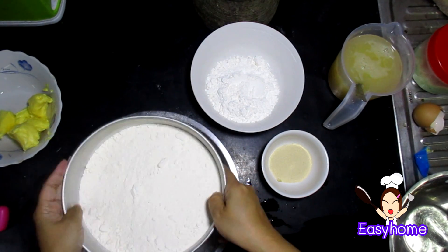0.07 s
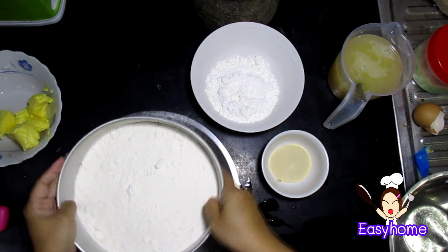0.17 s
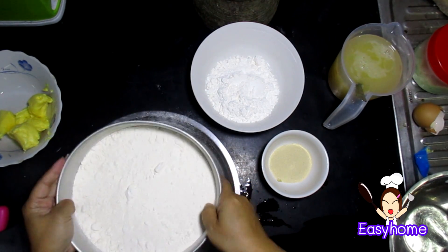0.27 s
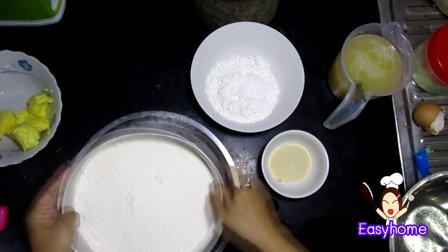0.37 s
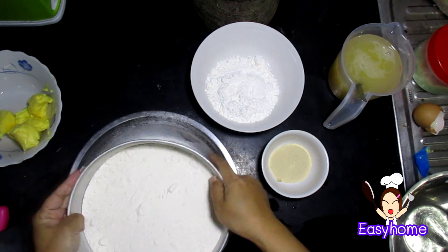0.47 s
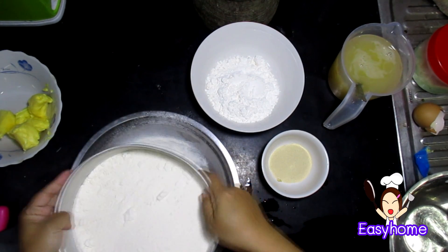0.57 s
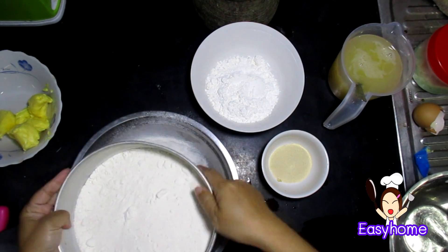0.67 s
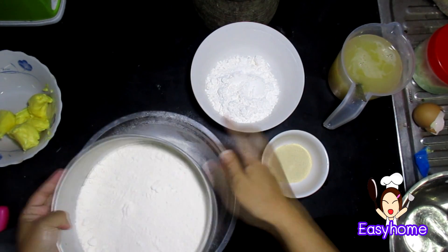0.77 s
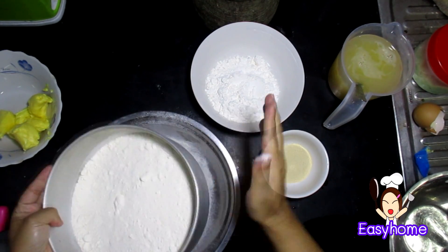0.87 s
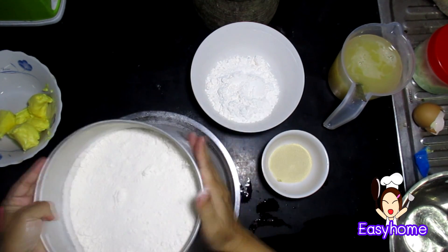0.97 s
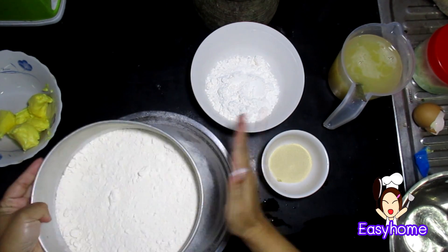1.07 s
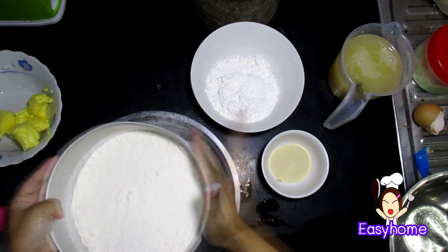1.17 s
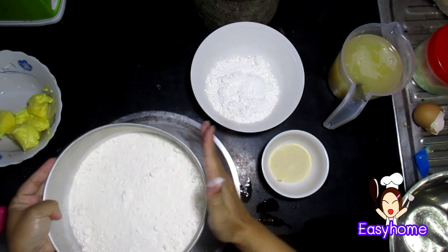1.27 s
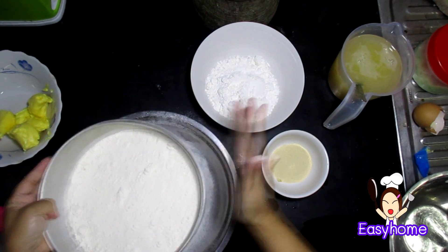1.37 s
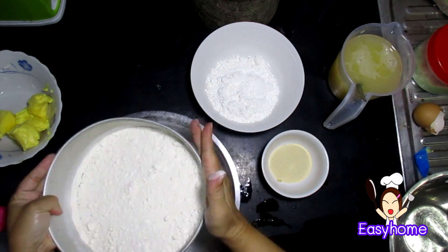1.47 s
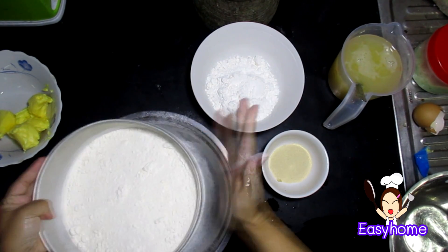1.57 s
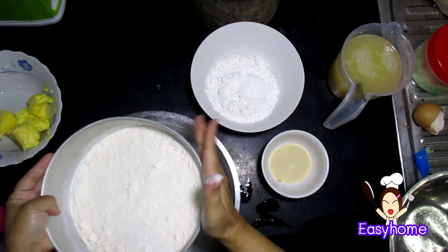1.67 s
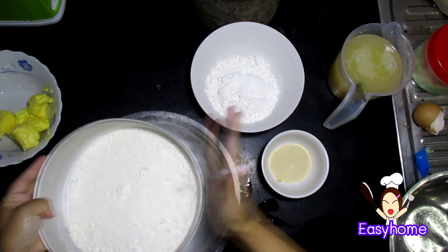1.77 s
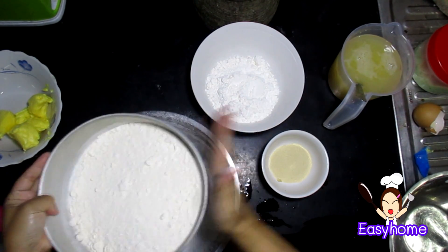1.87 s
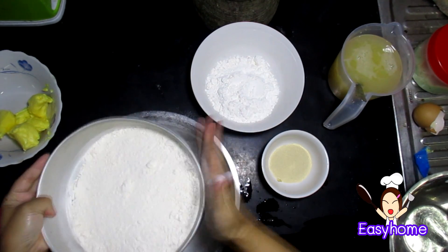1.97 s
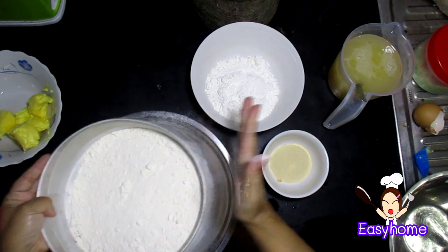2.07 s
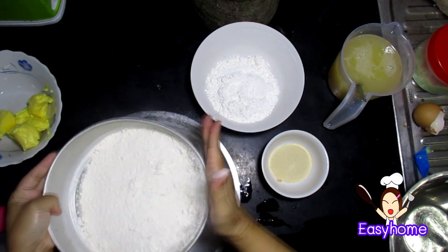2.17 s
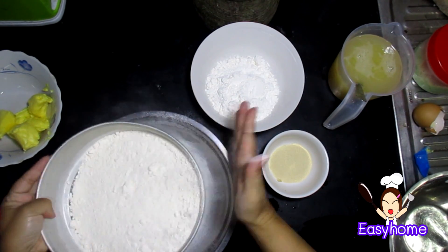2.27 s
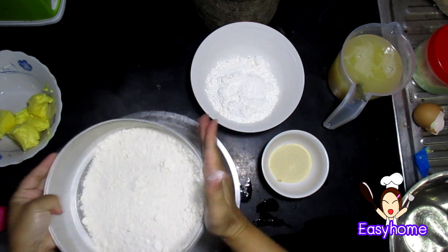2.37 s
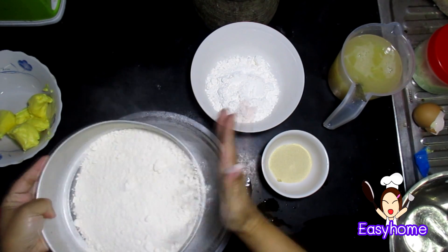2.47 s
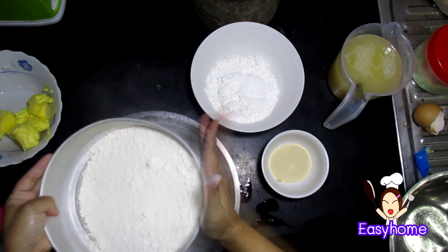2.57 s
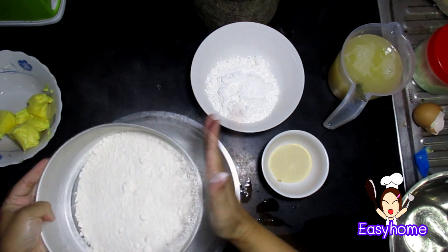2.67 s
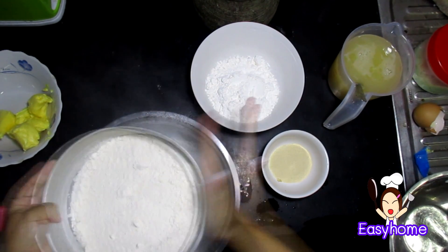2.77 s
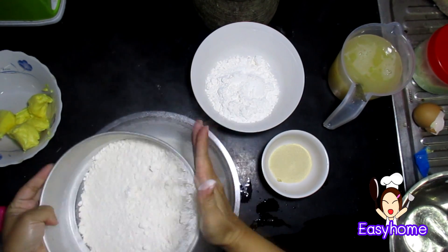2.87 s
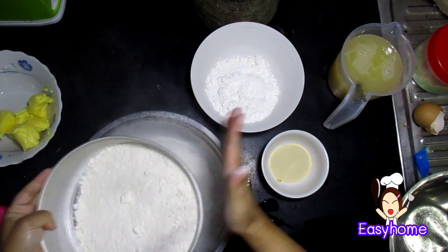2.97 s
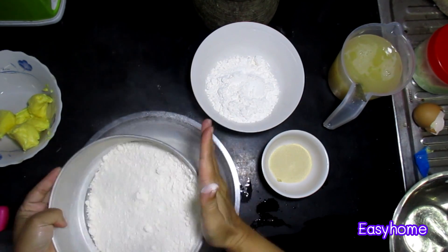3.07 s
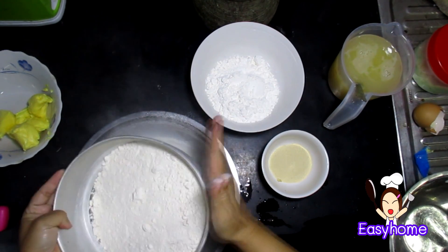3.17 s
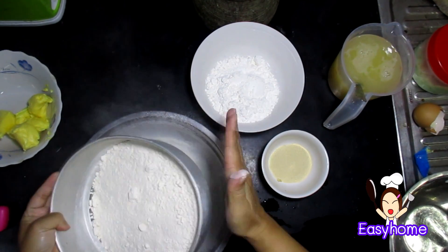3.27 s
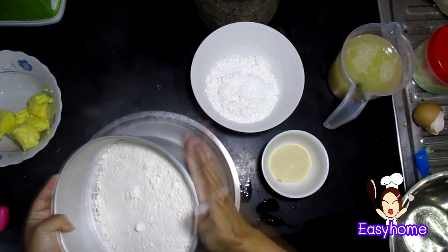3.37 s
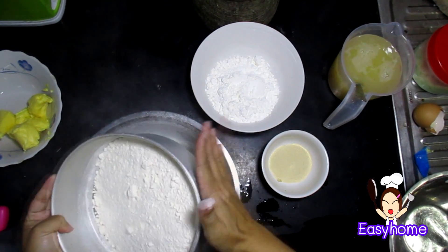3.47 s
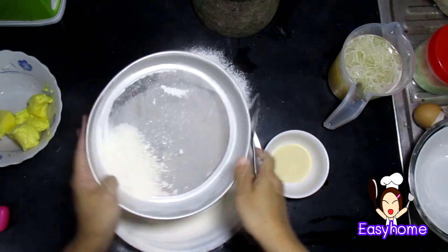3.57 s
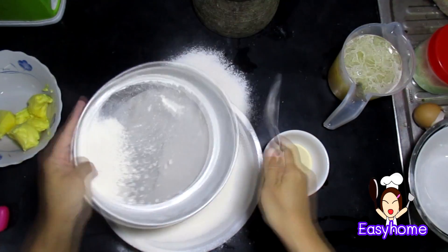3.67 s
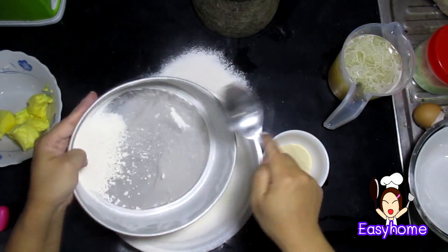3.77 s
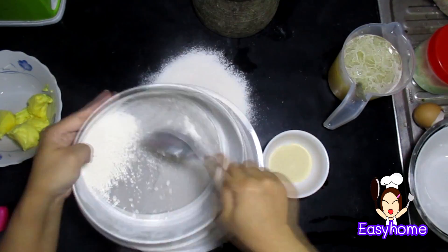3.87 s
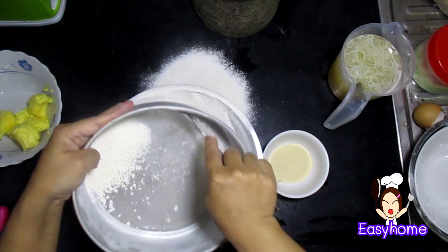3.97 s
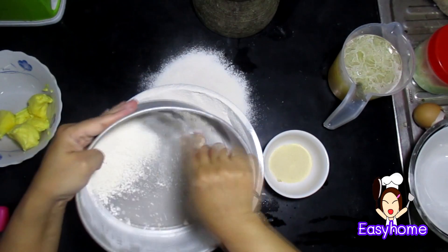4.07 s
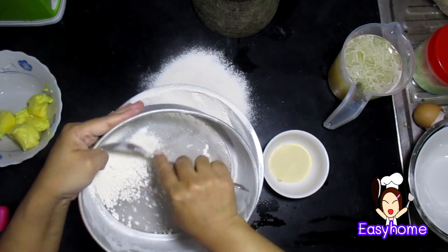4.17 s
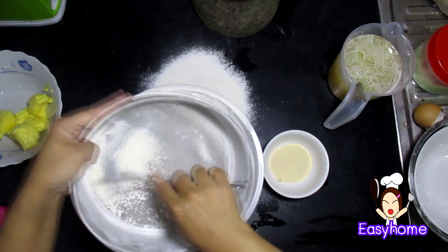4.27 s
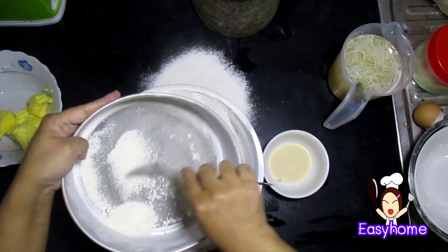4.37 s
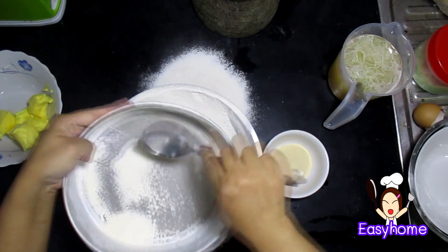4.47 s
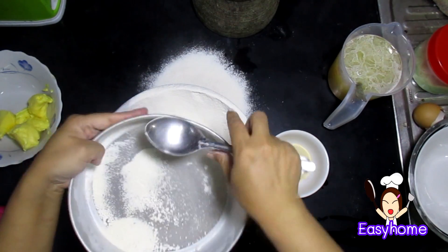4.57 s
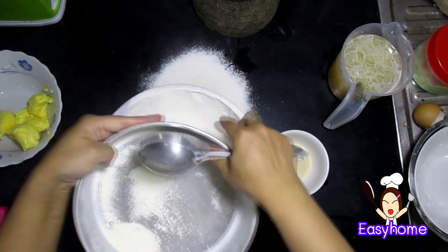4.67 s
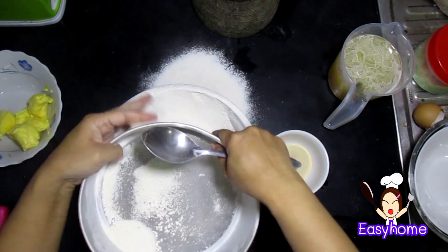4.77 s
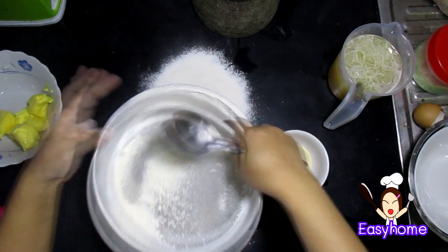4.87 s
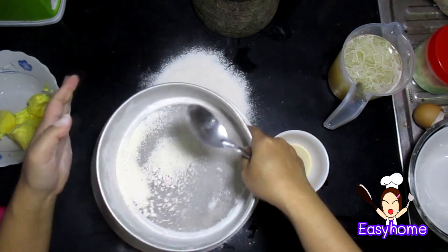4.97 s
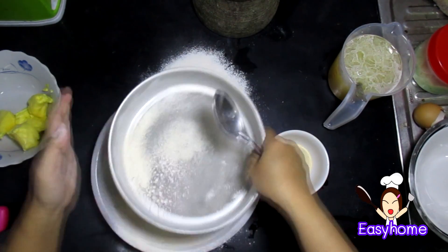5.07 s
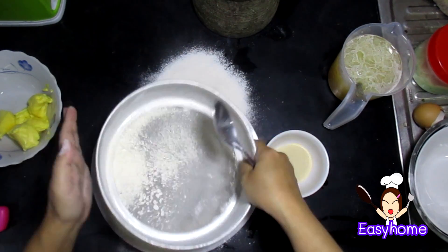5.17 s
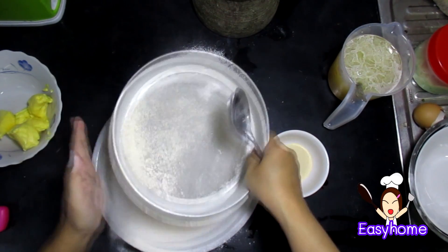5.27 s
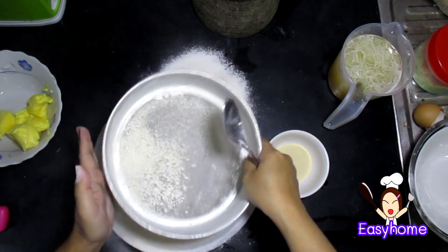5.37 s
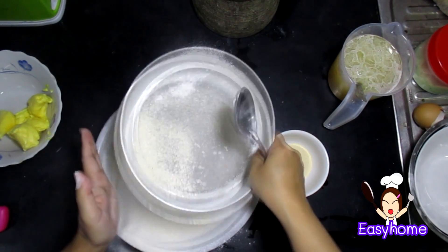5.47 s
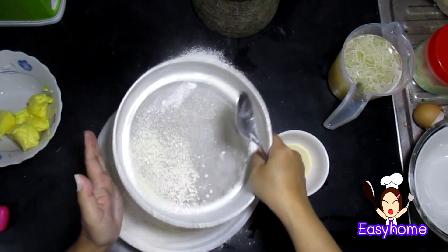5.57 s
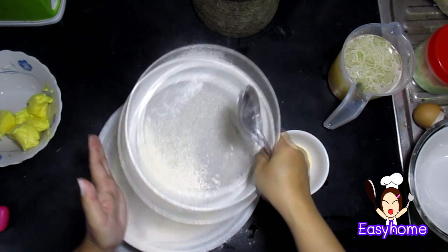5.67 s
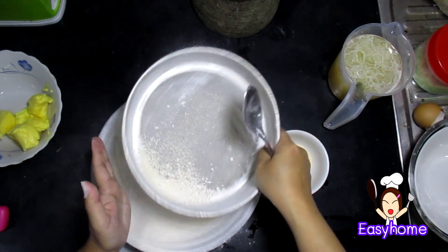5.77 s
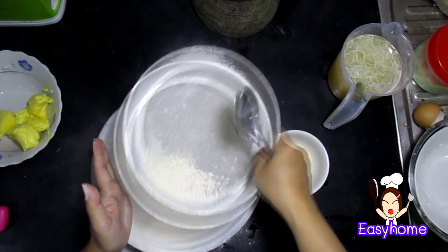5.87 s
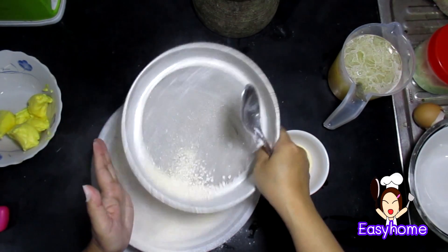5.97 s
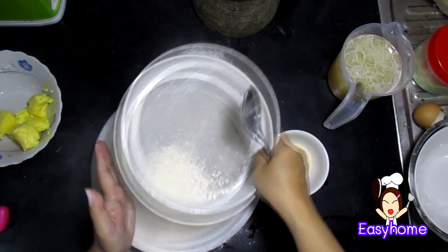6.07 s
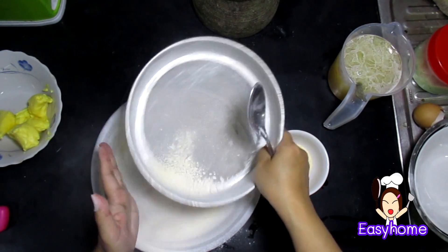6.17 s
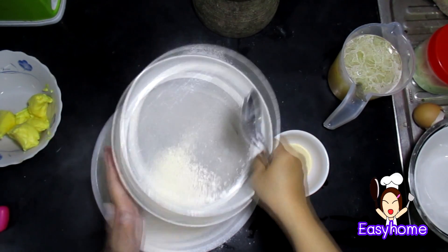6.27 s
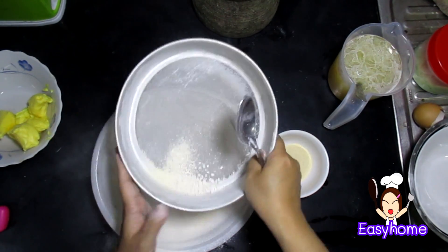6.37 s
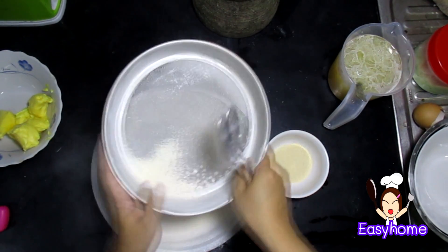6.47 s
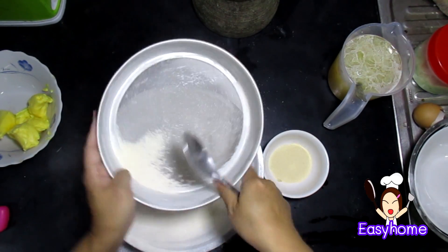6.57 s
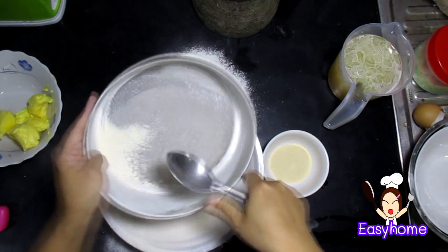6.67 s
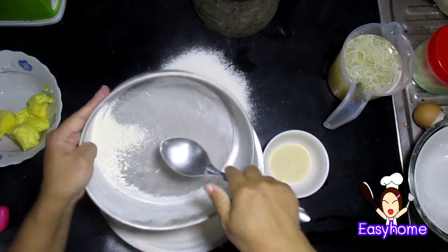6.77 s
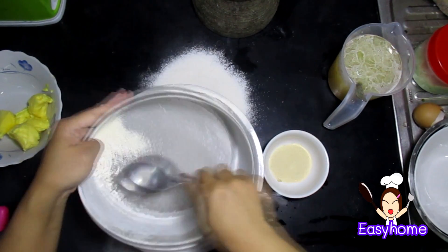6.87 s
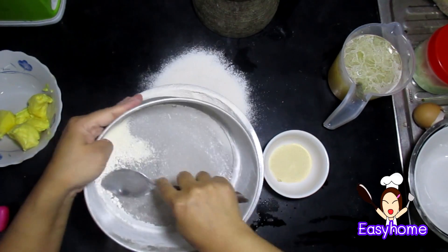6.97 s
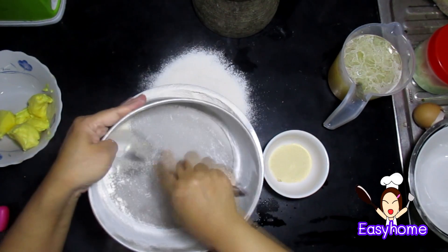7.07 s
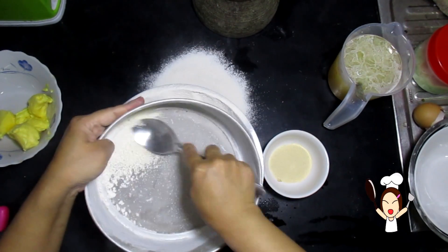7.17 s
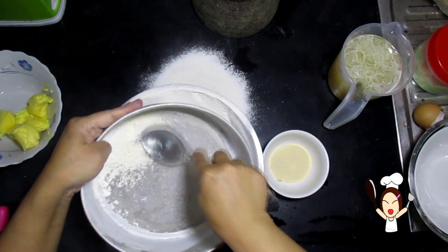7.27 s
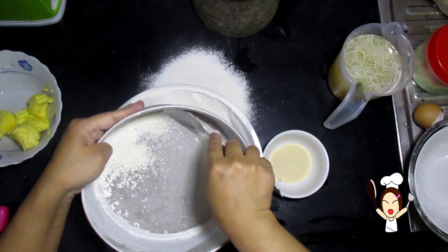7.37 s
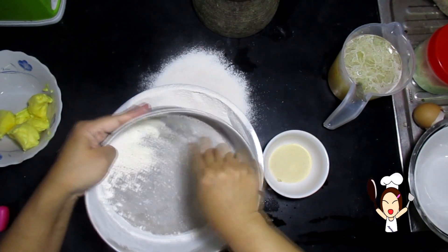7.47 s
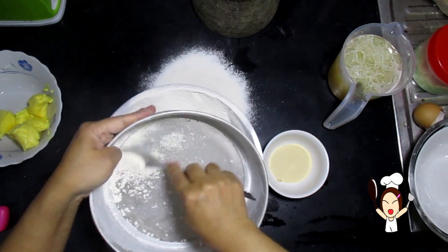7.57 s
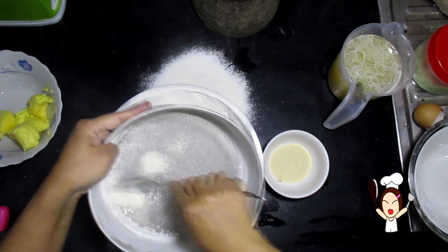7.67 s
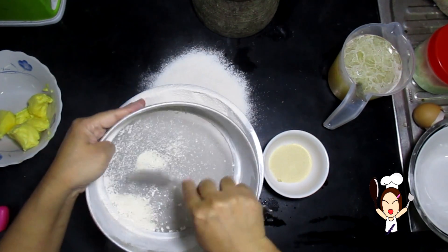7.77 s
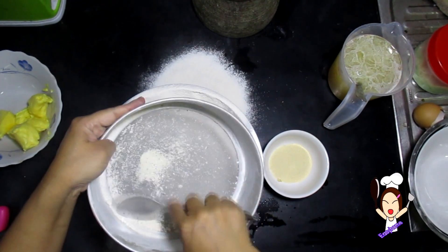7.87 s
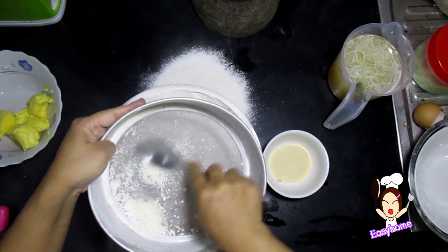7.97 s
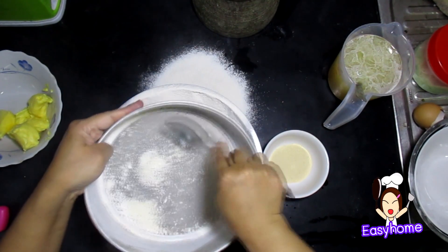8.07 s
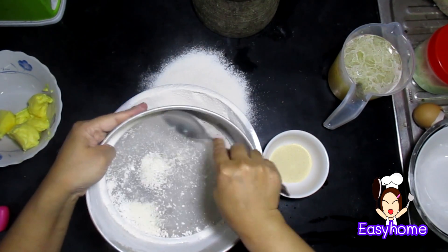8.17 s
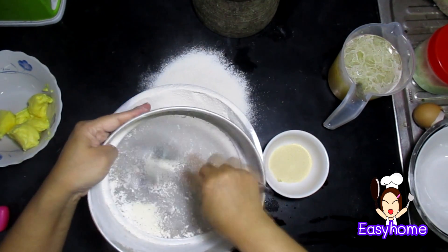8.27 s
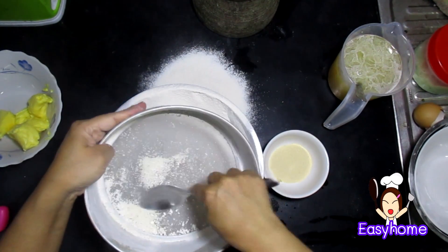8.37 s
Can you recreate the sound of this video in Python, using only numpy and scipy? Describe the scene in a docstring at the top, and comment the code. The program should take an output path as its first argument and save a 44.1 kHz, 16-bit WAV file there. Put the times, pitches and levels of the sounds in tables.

```python
"""A round metal sieve full of flour, in a kitchen, on one microphone. A palm slaps the rim and the laden
mesh thumps; then a metal spoon scrapes and knocks it, with a gentle shake between two bouts. Blows and
scrapes set the metal ringing, and flour hisses across the wires. Behind it the kitchen hums at mains
pitch, a far engine is heard idling at first and a narrow hiss, perhaps insects, sits near 7.5 kHz."""
import sys
import numpy as np
from scipy import signal
from scipy.fft import rfft, irfft
from scipy.io import wavfile

SR = 44100
rng = np.random.default_rng(int(sys.argv[2]) if len(sys.argv) > 2 else 0)


def wav_out(sig):
    """Save sig, one row per channel (or a flat mono array), as 16-bit PCM at SR to the path in sys.argv[1]."""
    wavfile.write(sys.argv[1], SR, np.round(np.clip(np.atleast_2d(sig).T, -1, 1) * 32767).astype(np.int16))


N = 371322

# palm on the rim: t/s, thump level/dB, mid-swing f/Hz, contact/s, crack level/dB,
# lows/dB and mids/dB re crack, favoured ring f/Hz, its force/dB re crack
SLAPS = [(0.9975, -7.5, 238, 0.0044, -1, -16, -7, 1420, -12.5),
         (1.231, -14.5, 168, 0.0076, -9.5, 4, 2, 2704, -8),
         (1.482, -5.5, 218, 0.0041, 0.3, -6.5, -18, 1100, -15),
         (1.713, -12.5, 213, 0.004, 0.6, -7.5, -2.5, 2734, -8),
         (1.943, -10, 222, 0.0027, -1.7, -2.5, -3, 2890, -21.5),
         (2.166, -8, 220, 0.004, -0.4, -10.5, -4.5, 1440, -13.5),
         (2.393, -7, 209, .004, -1.5, -10, -3.5, 1410, -14),
         (2.6226, -10, 211, 0.0043, -4.5, -4.5, -5, 2100, -22),
         (2.8557, -9, 244, .004, -3.5, -3, -2.5, 1100, -17),
         (3.089, -15.5, 287, 0.0037, -12, 2, -4, 1070, -20),
         (3.4376, -19.5, 159, 0.0047, -14.5, -3, -8, 570, -23),
         (3.6194, -41, 162, 0.013, -21.5, -1.5, -9, 2270, -16)]
# modes of sieve and spoon: f/Hz, level/dB, t60/s before damping
METAL_MODES = [(541, -2, 0.089), (1107, -8.5, 0.061), (1417, -9, 0.071), (1610, -6.5, 0.3),
               (2090, -16, 0.23), (2080, -9.5, 0.074), (2317, -1, 0.094), (2510, 0, 0.12),
               (2574, -8.5, 0.2), (2740, -14.5, 0.11), (2850, -19.5, 0.32), (2870, -14, 0.36),
               (2975, -5, 0.21), (3080, 0, 0.065), (3340, -12.5, 0.22), (3780, -14.5, 0.26),
               (5040, -18, 0.055), (5330, 3, 0.078), (6860, 6.5, 0.099), (7240, 6, 0.042),
               (7260, -1.5, 0.19), (7950, 5, 0.078), (8440, 9.5, 0.12), (9330, 6, 0.13), (11190, 0.5, 0.16),
               (12700, -18, .06), (12900, -14, .05)]


def palm_slaps():
    """The palm cracks against the rim: the sound, and the force on the modes."""
    return blows([(s, *crack) for s, _, _, *crack in SLAPS], tail_db=-15.5, unfavoured_db=-41)


def mesh_thumps():
    """The laden mesh swings like a smothered drum skin, tightening as it goes; a dull rumble lingers."""
    out, t = np.zeros(N + SR), np.arange(SR // 5) / SR
    rumble = rms_one(band(rng.standard_normal(N), 92, 430))
    swing_gain = np.exp(-((t - .006) / 0.0041) ** 2) * (1 - np.exp(-t / 0.00052))
    rumble_gain = from_db(-15.5 - 60 * t / 0.17) * (1 - np.exp(-t / 0.0051))
    for s, thump_db, hz, *_ in SLAPS:
        i = round(s * SR)
        phase = 2 * np.pi * hz * t * (0.886 + 8.5 * t)
        swing = swing_gain * (from_db(-15.5) * np.sin(1.92 * phase) - np.sin(phase))
        out[i:i + len(t)] += from_db(thump_db) * (swing + rumble_gain * rumble[i:i + len(t)])
    return signal.sosfilt(signal.butter(2, 70, "high", fs=SR, output="sos"), out[:N])


def spoon_knocks():
    """The spoon strikes mesh or rim: the sound, and the force on the modes."""
    # t/s, contact/s, crack level/dB; re crack: lows/dB, mids/dB, two favoured rings (f/Hz, force/dB)
    knocks = [(4.0452, 0.0035, -3.5, -4.5, -8, 1100, -6, 2710, -8.5),
              (4.0574, 0.0047, -2.5, -3.5, 1.5, 1086, -3.5, 3040, -25),
              (4.180, .0072, -9, -19.5, -21, 8000, -15, 2030, -10),
              (4.2227, .0038, -10.5, 3, 9, 2070, 6, 564, -20),
              (4.6195, 0.0026, -5.5, 3.5, 5.5, 1090, -2, 3680, -8),
              (4.6255, .0055, -5, -21, -23, 7560, -10, 11400, -20),
              (4.7156, 0.0025, 0, -13, -8, 2000, -7.5, 3470, -14),
              (7.0522, 0.0037, -22, 11, 7.5, 557, -7, 5325, -12),
              (7.0884, 0.0063, -26, 15.5, 13, 560, 6.5, 1100, 7),
              (7.13, .004, -26, -6, 3, 2280, -10, 2800, -11),
              (7.177, .004, -25.5, -6, 7, 2280, -9, 1600, -21),
              (7.226, 0.0046, -21, -4, -3, 2290, -18, 3000, -26),
              (7.422, .0034, 0.7, -4, -7, 1070, -7, 2800, -19),
              (7.4548, .0046, -13.5, -7.5, 6, 2210, -12, 1090, -3),
              (7.913, .0044, -16.5, 9.5, 11, 547, -2.5, 2235, -0.5),
              (7.9686, 0.0051, -18, -9, -4, 3330, -5, 5100, -23),
              (8.0015, .0035, -3, -33, -13, 3000, -20, 12110, 1),
              (8.0294, 0.0055, -11, -33, 0, 3100, -14, 7900, -28)]
    return blows(knocks, tail_db=-11, unfavoured_db=-27)


def blows(rows, tail_db, unfavoured_db):
    """Each blow rattles during contact, dies away band by band and kicks the metal's modes."""
    crack_spectrum = [(300, -5), (550, 8.5), (3500, 1), (4500, -1), (5200, 3), (8000, 0.5), (11000, -2),
                      (14000, -7.5), (16000, -15)]   # contact noise: f/Hz, level/dB
    tail_decay = [(400, 0.27), (1500, 0.23), (4000, .2), (8000, 0.19), (15000, 0.18)]   # sound lingering after a blow: f/Hz, t60/s
    edges = 35 * 2 ** (np.arange(9, 28) / 3)   # third octaves from 280 Hz
    centres = np.sqrt(edges[1:] * edges[:-1])
    size, mode_hz = SR // 3, np.array(METAL_MODES)[:, 0]
    t = np.arange(size) / SR
    out, forces = np.zeros(N + SR), np.zeros((len(mode_hz), N + SR))
    noise = coloured(grains(9000, spread_db=1.5), crack_spectrum)
    bands = np.array([band(noise, low, high) for low, high in zip(edges[:-1], edges[1:])])
    tail = from_db(tail_db - 60 * t / at_hz(tail_decay, centres)[:, None])
    for s, contact_s, crack_db, low_db, mid_db, *favoured in rows:
        i, start = round(s * SR), rng.integers(0, N - size)
        rattle = bands[:, start:start + size]
        burst = t / contact_s * np.exp(1 - 2 * t / contact_s)
        tilt = from_db(at_hz([(800, low_db), (2200, mid_db), (4500, 0)], centres))[:, None]
        # the burst carries its full energy in every band
        full_energy = (rattle ** 2).mean(axis=1) * (burst ** 2).sum()
        trim = np.sqrt(full_energy / ((rattle * burst) ** 2).sum(axis=1))
        envelope = trim[:, None] * burst + tail * (1 - np.exp(-t / contact_s))
        out[i:i + size] += from_db(crack_db) * (tilt * envelope * rattle).sum(axis=0)
        force = from_db(unfavoured_db + rng.normal(0, 3, len(mode_hz)))
        for hz, db in np.reshape(favoured, (-1, 2)):   # the spot struck favours some modes
            force += from_db(db) * np.exp(-(np.log(mode_hz / hz) / .06) ** 2)
        signs = rng.choice([-1, 1], len(mode_hz))
        forces[:, i + round(contact_s * SR / 2)] += from_db(crack_db) * force * signs
    return out[:N], forces[:, :N]


def spoon_scrapes():
    """The spoon's edge jumps from wire to wire: a grainy rasp, and force mostly on the lower modes."""
    # bite t/s, level/dB, ease t/s, level/dB, swell/(dB/s), fade/(dB/s);
    # re rasp: treble/dB, mids/dB, lows/dB
    strokes = [(4.075, -30.5, 4.24, -36, 1500, 120, -27, -10.5, -10),
               (4.19, -20.5, 4.248, -23.5, 1230, 700, -25, -7, -18),
               (4.312, -14, 4.3745, -20, 453, 290, -21, -7, -35),
               (7.1, -34, 7.27, -38, 500, 260, -15, -10.5, -6.5),
               (7.586, -20.5, 7.695, -19.5, 139, 257, -25, -8, -36),
               (7.93, -42, 7.99, -36, 800, 300, -10, -7, -14),
               (8.007, -20, 7.99, -23, 1530, 153, -9, -7.5, -36),
               (8.223, -33.5, 8.28, -23, 2200, 120, -25, -5, -22)]
    rasp_spectrum = [(2500, -58), (3500, -39), (4300, 8.5), (5100, 14), (6000, 10), (8000, 12.5),
                     (10400, 2.5), (11800, 4.5), (14800, -8), (16000, -6)]   # edge on wire: f/Hz, level/dB
    pressure = np.array([swell(*row[:6]) for row in strokes]) * from_db(0.96 * drift(77))
    treble, mids, lows = from_db(np.array(strokes)[:, 6:].T) @ pressure
    clicks = grains(6000, spread_db=-0.5)
    rasp = pressure.sum(axis=0) * coloured(clicks, rasp_spectrum)
    for gain, low_hz, high_hz in (treble, 10000, 15500), (mids, 1890, 3830), (lows, 440, 1310):
        rasp += gain * rms_one(band(clicks, low_hz, high_hz))
    force = from_db(-26.5) * mids * band(clicks, 900, 5500)
    # the moving edge feeds each mode by turns
    return rasp, [force * from_db(3 * drift(20)) for _ in METAL_MODES]


def spoon_squeals():
    """The edge chatters over the wires in short gliding tones, unsteady in level and pitch."""
    squeals = [(4.184, .05, 8250, 7850, -24), (4.207, 0.021, 2780, 2750, -28),
               (4.224, 0.033, 568, 557, -28), (4.299, 0.062, 2060, 2340, -22),
               (4.316, 0.038, 2445, 2324, -20.5), (4.305, 0.046, 4900, 5060, -20),
               (4.34, 0.042, 2800, 2830, -25), (4.34, 0.04, 8200, 8200, -22),
               (7.111, 0.027, 2280, 2320, -37), (7.543, .03, 2500, 2520, -28),
               (7.55, 0.077, 3015, 3005, -27.5), (7.593, 0.069, 1546, 1650, -29.5),
               (7.64, 0.053, 1100, 1167, -27), (7.654, 0.05, 2290, 2300, -15.5),
               (7.68, 0.042, 3000, 3040, -19), (7.686, 0.062, 1090, 1100, -32)]   # t/s, length/s, start f/Hz, end f/Hz, level/dB
    out, flutter, waver = np.zeros(N), from_db(4.2 * drift(67)), 1 + 0.011 * drift(86)
    for s, length_s, start_hz, end_hz, db in squeals:
        i, size = round(s * SR), round(length_s * SR)
        phase = 2 * np.pi * np.cumsum(np.linspace(start_hz, end_hz, size) * waver[i:i + size]) / SR
        out[i:i + size] += from_db(db) * np.sqrt(np.hanning(size)) * flutter[i:i + size] * np.sin(phase)
        flutter, waver = np.roll(flutter, SR), np.roll(waver, SR)   # each squeal wavers its own way
    return out


def metal_ring(forces, t60_share):
    """Every mode rings under its own force, damped to a share of its decay time."""
    return sum(from_db(db) * ring(force, hz, t60_share * t60)
               for force, (hz, db, t60) in zip(forces, METAL_MODES))


def flour():
    """Fine grains hiss across the mesh; small lumps tick among them."""
    slides = [
        [(.4, -64), (.78, -65)],
        [(3.72, -55), (4.0, -65)],
        [(4.79, -47), (4.99, -58), (5.04, -63)],
        [(5.2, -57), (5.4, -49), (6.3, -48.5), (6.66, -47), (6.72, -52), (6.85, -68)],
    ]   # spells of steady sliding, each a list of t/s, level/dB
    jolts = [(0.364, .003, -47, 700), (.43, .002, -49, 800), (0.462, 0.018, -50, 400),
             (.694, .004, -54, 600), (.794, .002, -49, 1000), (3.238, .01, -62, 260),
             (3.44, 0.0022, -55, 400), (3.635, 0.025, -39, 320), (4.86, 0.0039, -45, 300),
             (5.163, .04, -48.5, 250), (5.265, .01, -53, 200), (5.35, 0.027, -46, 300),
             (5.93, .01, -50, 300), (6.31, .01, -51, 200), (6.39, .015, -40.5, 200), (6.63, .03, -47, 200),
             (6.737, 0.028, -42, 450)]   # jolts throwing the flour about: t/s, hold/s, level/dB, fade/(dB/s)
    grain_spectrum = [(2000, -9), (4000, -9), (5000, -3.5), (6200, -6.5), (8300, 1), (9800, -4),
                      (10800, -6), (11600, -4.5), (13500, -9), (16000, -14)]   # flour on wire: f/Hz, level/dB
    jolt_power = sum(swell(s, db, s + hold, db, swell_db_per_s=700, fade_db_per_s=fade) ** 2
                     for s, hold, db, fade in jolts)
    gain = np.sqrt(level_curve(slides) ** 2 + jolt_power)
    powder, lumps = grains(9000, spread_db=-3.0), grains(300, spread_db=0.5)
    return gain * from_db(1.4 * drift(30)) * coloured(powder + from_db(-10) * lumps, grain_spectrum)


def kitchen():
    """Behind the sieve: room tone, mains hum and a narrow hiss, on one level curve."""
    # background level, dipping and recovering as if under a recorder's gain control: t/s, level/dB
    levels = [(0.0, -37.5), (0.37, -40), (1.0, -40), (1.81, -43.5), (3.0, -43), (4.1, -41), (4.69, -43),
              (4.92, -47.5), (5.6, -43), (6.5, -40), (7.17, -39.5), (7.55, -40), (8.42, -39.5)]
    room_spectrum = [(21, -9), (40, -7), (100, -10), (240, -10), (620, -12), (930, -12), (1270, -18.5),
                     (2500, -26.5), (5450, -32.5), (8400, -35), (14100, -40), (16000, -52)]   # room tone: f/Hz, level/dB
    hum_tones = [(50, -7), (99, -5), (150, -8), (198, -7), (292, -10), (600, -10)]   # mains hum: f/Hz, level/dB re room tone
    hiss_hz, hiss_width_hz, hiss_db = 7410, 890, -15
    air = from_db(0.55 * drift(5.4)) * coloured(rng.standard_normal(N), room_spectrum)
    hum = sum(wavering(hz, db, depth_db=2.5) for hz, db in hum_tones)
    hiss = band(rng.standard_normal(N), hiss_hz - hiss_width_hz / 2, hiss_hz + hiss_width_hz / 2)
    return level_curve([levels]) * (air + hum + from_db(hiss_db) * rms_one(hiss))


def far_engine():
    """A low drone, like a far idling engine, heard until it cuts off near 3.6 s."""
    levels = [(0.0, -30), (0.37, -35.5), (1.81, -37), (3.6, -38.5)]   # the drone: t/s, level/dB
    overtones = [(3, -5.5), (4, -10)]   # multiple of the drone's pitch, level/dB re drone
    drone_hz = 28.04
    drone = wavering(drone_hz, 0, depth_db=0.9)
    drone += sum(wavering(drone_hz * k, db, depth_db=3.5) for k, db in overtones)
    return level_curve([levels]) * drone


def from_db(db):
    """Decibels to gain."""
    return 10 ** (np.asarray(db) / 20)


def rms_one(x):
    """Scale to unit rms."""
    return x / np.sqrt(np.mean(x ** 2) + 1e-20)


def level_curve(spells):
    """Gain through spells of (t/s, level/dB) points, silent between spells."""
    points = []
    for spell in spells:
        points += [(spell[0][0] - .01, -100), *spell, (spell[-1][0] + .03, -100)]
    return from_db(np.interp(np.arange(N) / SR, *np.transpose(points)))


def swell(bite_s, bite_db, ease_s, ease_db, swell_db_per_s, fade_db_per_s):
    """Gain that swells to one level, moves to a second, then fades."""
    t = np.arange(N) / SR
    db = np.interp(t, [bite_s, ease_s], [bite_db, ease_db])
    db -= swell_db_per_s * np.maximum(bite_s - t, 0)
    db -= fade_db_per_s * np.maximum(t - ease_s, 0)
    return from_db(np.maximum(db, -200))


def drift(rate_hz):
    """Smooth random wander of rms 1."""
    step = 40
    pole = np.exp(-2 * np.pi * rate_hz * step / SR)
    slow = signal.lfilter([1], [1, -2 * pole, pole * pole], rng.standard_normal(N // step + 2002))[2000:]
    return np.interp(np.arange(N) / step, np.arange(len(slow)), rms_one(slow))


def wavering(hz, db, depth_db):
    """A tone that wanders in level and a little in pitch."""
    gain = from_db(db + depth_db * drift(2.2))
    return gain * np.sin(2 * np.pi * np.cumsum(hz * (1 + .008 * drift(2.49))) / SR)


def ring(clicks, hz, t60):
    """A unit click sets a sine of height 1 ringing."""
    r, w = from_db(-60 / (t60 * SR)), 2 * np.pi * hz / SR
    return signal.lfilter([0, np.sin(w)], [1, -2 * r * np.cos(w), r * r], clicks + 1e-18)


def grains(per_s, spread_db):
    """Dense random clicks of uneven size."""
    sizes = from_db(spread_db * np.minimum(rng.exponential(1, N), 5)) * rng.choice([-1, 1], N)
    return rms_one(sizes * (rng.random(N) < per_s / SR))


def at_hz(points, hz):
    """Read (f/Hz, value) points on a log-frequency axis."""
    point_hz, values = np.transpose(points)
    return np.interp(np.log(hz), np.log(point_hz), values)


def coloured(source, spectrum):
    """Give a steady source the spectrum; rms 1."""
    hz = np.maximum(np.fft.rfftfreq(N, 1 / SR), 1)
    return rms_one(irfft(rfft(source) * from_db(at_hz(spectrum, hz)), N))


def band(x, low_hz, high_hz):
    """Band-pass."""
    return signal.sosfilt(signal.butter(2, [low_hz, high_hz], "band", fs=SR, output="sos"), x)


def scene():
    """The sieve in front, kitchen and engine behind, all on one microphone."""
    slaps, slap_forces = palm_slaps()
    knocks, knock_forces = spoon_knocks()
    rasp, scrape_forces = spoon_scrapes()
    struck = metal_ring(slap_forces + knock_forces, t60_share=0.62)
    pressed = metal_ring(scrape_forces, t60_share=.3)   # a pressing spoon shortens the ring
    sieve = slaps + mesh_thumps() + knocks + rasp + spoon_squeals() + struck + pressed + flour()
    return (sieve + kitchen() + far_engine())[None]


def record(dry):
    """A steep low-pass cuts the top, 60 dB down at 16.5 kHz."""
    return signal.sosfilt(signal.cheby2(14, 60, 16500, fs=SR, output="sos"), dry)


dry = scene()
out = record(dry)
wav_out(out)
```